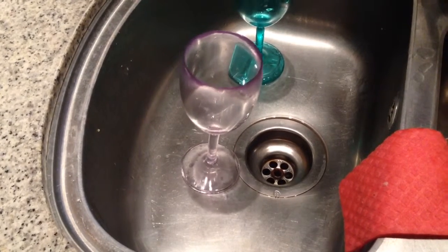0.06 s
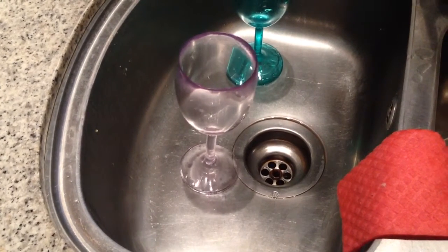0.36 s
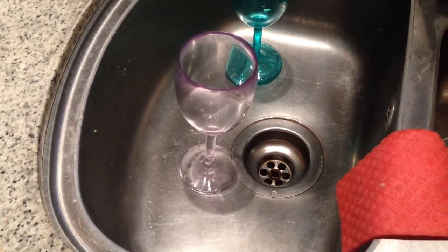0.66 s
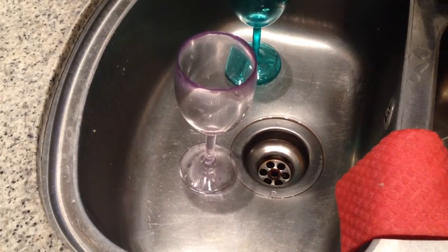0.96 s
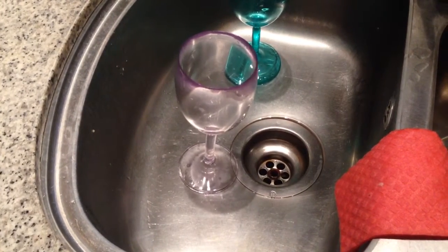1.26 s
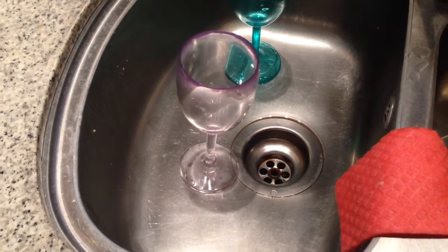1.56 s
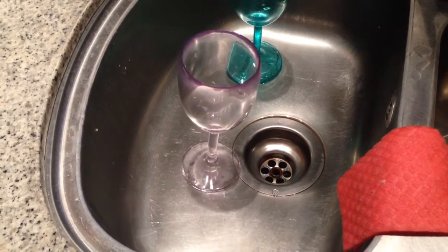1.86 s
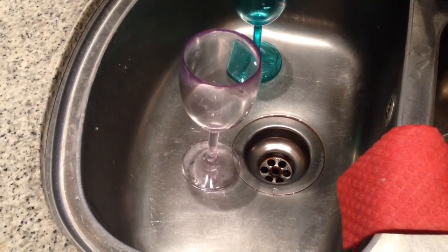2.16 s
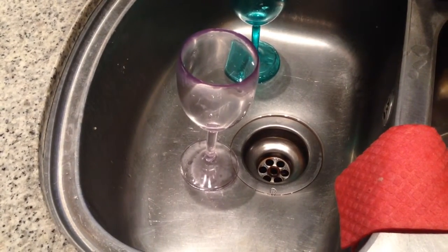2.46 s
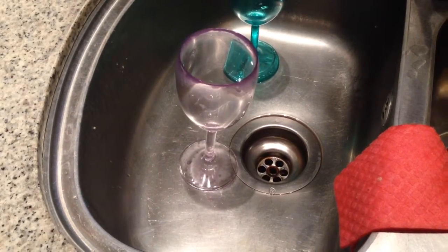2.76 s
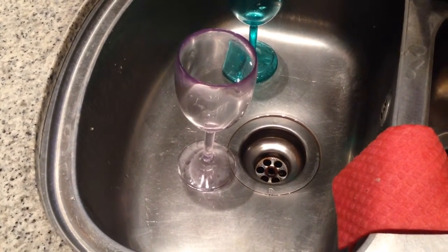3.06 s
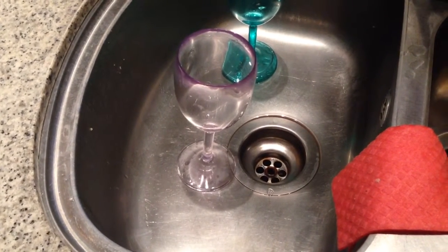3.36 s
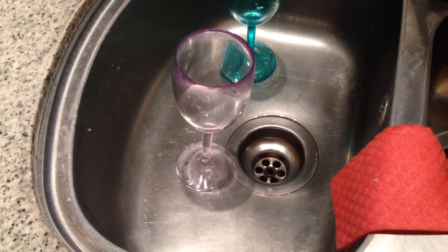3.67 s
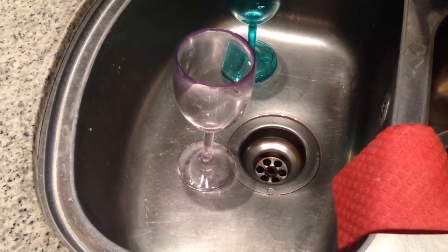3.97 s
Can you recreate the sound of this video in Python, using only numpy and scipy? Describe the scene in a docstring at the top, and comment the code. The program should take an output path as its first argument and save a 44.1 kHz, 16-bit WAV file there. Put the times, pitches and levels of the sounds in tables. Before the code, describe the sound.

A plastic wine glass chatters against a steel sink from the start, each knock a light tick with a hollow metal boom. The rattling comes in quick, uneven bursts, strongest from about 0.6 to 1.2 seconds and again around 1.8 to 2.1. It then grows sparser, with a brief flurry near 2.9, fading to soft bumps that end around 3.5 seconds. A faint hiss continues in the small kitchen.

```python
"""Plastic wine glass wobbling in a steel sink

The foot of the glass chatters on the metal in quick, uneven bursts that fade to soft bumps.
Each impact excites damped modes: the basin booms and clangs, the foot clacks, the plastic ticks.
A small kitchen reverberates faintly over a steady hiss."""
import sys
import numpy as np
from scipy import signal
from scipy.fft import rfft, irfft
from scipy.io import wavfile

SR = 44100
rng = np.random.default_rng(int(sys.argv[2]) if len(sys.argv) > 2 else 0)


def int16_out(signal):
    """Quantize to a 16-bit WAV file."""
    q = np.round(np.clip(np.atleast_2d(signal).T, -1, 1) * 32767)
    wavfile.write(sys.argv[1], SR, q.astype(np.int16))


N = 176400

# impacts of the foot on the basin; each part adds its own gain to these levels:
# start_s, boom_db, thud_db, thud_hz, clang_db, clack_db, tick_db
KNOCKS = [(0, -40.5, -43.5, 206, -45.5, -60, -55), (0.0539, -53, -44, 228, -70, -59.5, -66),
          (0.091, -68, -37, 215, -44.5, -56, -53), (0.1394, -42, -29.5, 218, -46, -58, -50),
          (0.1875, -36.5, -28.5, 213, -41.5, -53.5, -51.5), (0.2325, -44, -51, 216, -49.5, -58.5, -63),
          (0.2382, -60, -47, 190, -45, -65, -61), (0.2702, -46.5, -63, 222, -52.5, -61, -63),
          (0.3281, -62, -48, 217, -49, -59, -57), (0.3579, -46, -42, 232, -52, -67, -61.5),
          (0.3808, -39.5, -44, 224, -51, -68, -61), (0.4022, -40.5, -52, 216, -56, -82, -67),
          (0.4232, -51.5, -49, 211.5, -58, -76, -64), (0.4417, -37, -48, 226, -54, -71, -62),
          (0.5385, -52, -49, 188, -54, -69, -78), (0.583, -56, -54, 215, -56, -65.5, -68),
          (0.6082, -44.5, -47, 211, -58, -65, -78), (0.6362, -39.5, -50, 213, -53, -60.5, -58),
          (0.6634, -34.5, -31, 214.5, -47, -59, -49), (0.6979, -35, -33.5, 209, -46.5, -62, -54.5),
          (0.731, -36.5, -32.5, 213, -50, -63, -49.5), (0.7629, -36, -39, 209, -44, -56, -51.5),
          (0.7951, -38, -29, 204.4, -48, -59, -50), (0.8935, -37, -38.5, 215, -51, -62, -56),
          (0.925, -41, -39.5, 220, -44, -64, -51.5), (0.9567, -35.5, -32.5, 213, -50, -61, -48),
          (0.9878, -57, -29.5, 217, -46.5, -64, -55.5), (1.0173, -39, -30.5, 208.4, -58, -58.5, -54),
          (1.047, -42, -54, 226, -48, -60, -56.5), (1.0588, -47, -52, 228, -49, -74, -78),
          (1.1221, -41, -38, 206.5, -48, -56, -53.5), (1.1525, -50, -49, 221, -52.5, -81, -61),
          (1.1759, -35.5, -60, 199, -66, -74, -80), (1.2985, -52, -48, 220, -49.5, -60.5, -60.5),
          (1.3624, -45.5, -42.5, 206, -51, -59.5, -62), (1.3803, -43, -45, 208, -60, -63, -57.5),
          (1.4022, -38, -47, 203, -51, -65, -58), (1.4489, -38.5, -38, 214, -53, -65, -57),
          (1.4952, -40, -43.5, 242, -60, -66, -56.5), (1.5135, -47, -47, 226, -49, -64, -59),
          (1.5302, -42, -52, 210, -53, -66, -65), (1.5837, -43, -45, 215, -51, -60.5, -59),
          (1.5955, -41, -43.5, 204, -54, -88, -68), (1.7437, -51, -45, 212, -49.5, -68, -68),
          (1.7809, -47, -51, 216, -61, -62, -68), (1.801, -40, -48, 232, -48.5, -64, -64),
          (1.812, -54, -59, 222, -51.5, -63.5, -57.5), (1.8392, -40.5, -37.5, 212, -60, -65, -56.5),
          (1.8676, -35, -41, 205, -45, -65, -52), (1.8987, -43.5, -30.5, 206, -47.5, -61, -52.5),
          (1.9269, -35, -51, 233, -60, -60, -52.5), (1.9305, -55, -37.5, 198, -43, -68, -64),
          (1.9839, -47, -54, 203, -51, -61, -60.5), (2.0048, -39.5, -42.5, 201, -49.5, -64, -58.5),
          (2.0268, -38, -51, 204, -59, -67, -57.5), (2.0488, -49, -49, 210, -53, -79, -69),
          (2.0698, -40.5, -42, 200, -55, -68, -60.5), (2.0906, -40, -55, 210, -53, -76, -65),
          (2.1122, -42.5, -48, 228, -55, -74, -70), (2.1852, -41.5, -43.5, 208, -48.5, -67, -57.5),
          (2.3219, -55, -52.5, 218, -56.5, -73, -84), (2.3846, -45, -49, 215, -55, -67, -62.5),
          (2.5103, -48.5, -62, 216, -59, -81, -80), (2.5694, -45, -62, 234, -55.5, -68, -61.5),
          (2.6023, -41, -53, 209, -63, -76, -64), (2.6204, -42, -49, 205, -55.5, -74, -65),
          (2.7126, -38, -41, 216, -54, -68, -61.5), (2.8248, -47, -55, 209, -59, -83, -78),
          (2.8733, -47, -44, 224, -56, -73, -63.5), (2.891, -42, -41.5, 209.6, -75, -70, -63),
          (2.9107, -35.5, -39.5, 199, -52.5, -68, -61.5), (2.983, -44.5, -46, 213, -62, -69, -70),
          (3.0614, -46, -62, 215, -66, -74, -77), (3.102, -42, -48, 204, -67, -68, -68.5),
          (3.1282, -46, -44, 217, -55, -77, -88), (3.1669, -49, -48, 218, -65, -83, -68.5),
          (3.2133, -80, -64, 220, -62, -74, -81), (3.3113, -48.5, -53.5, 204, -65, -77, -85),
          (3.3857, -52.5, -65, 214, -61, -86, -69), (3.4652, -49.5, -64, 210, -65.5, -77, -78)]


def amp(db):
    """Amplitude grows tenfold for every 20 dB."""
    return 10 ** (np.asarray(db) / 20)


def unit(x):
    """Normalisation to an rms of 1."""
    return x / np.sqrt(np.mean(x ** 2) + 1e-20)


def read(points, hz):
    """Interpolation of a table along a logarithmic frequency axis."""
    freqs, values = np.transpose(points)
    return np.interp(np.log(hz + 1), np.log(freqs + 1), values)


def add(mix, start_s, sound):
    """Superposition: a sound joins the mix at its start time."""
    part = mix[max(round(start_s * SR), 0):][:len(sound)]
    part += sound[:len(part)]


def noise(spectrum, size):
    """Spectral shaping: white noise takes on the given colour, at an rms of 1."""
    gain = amp(read(spectrum, np.fft.rfftfreq(size, 1 / SR)))
    return unit(irfft(rfft(rng.standard_normal(size)) * gain, size))


def contact(peak_s, size):
    """Contact force: a pulse that swells to its peak and relaxes exponentially."""
    u = np.arange(size) / SR / peak_s
    return u * np.exp(1 - u)


def ring(modes, size, detune=0):
    """Free vibration: each mode is an exponentially damped sine, one to a row."""
    hz, db, t60 = np.transpose(modes)[:3, :, None]
    t = np.arange(size) / SR
    hz = hz * (1 + detune * rng.standard_normal(hz.shape))
    end_fade = np.minimum(10 * (1 - t / t[-1]), 1)
    return amp(db - 60 * t / t60) * np.sin(2 * np.pi * hz * t) * end_fade


def strike(modes, peak_s, size, tilt_db=0):
    """Forced vibration: a short, rough skid drives the modes, a little differently each time."""
    roughness, spread_db = 6, 1.3
    rings = ring(modes, size, detune=0.007)
    push = contact(peak_s, size=SR // 50)
    t = np.arange(len(push)) / SR
    cycles = np.transpose(modes)[0][:, None] * t + rng.random((len(modes), 1))
    drive = push * (np.sin(2 * np.pi * cycles) + roughness * rng.standard_normal(cycles.shape))
    shaken = signal.fftconvolve(rings, drive, axes=1)
    keep_energy = np.linalg.norm(rings, axis=1) / np.linalg.norm(shaken, axis=1)
    gains = keep_energy * amp(tilt_db + spread_db * rng.standard_normal(len(rings)))
    sound = gains @ shaken
    return sound / np.sqrt(np.mean(sound[:round(0.012 * SR)] ** 2))  # rms 1 over the first 12 ms


def background():
    """Stationary noise: broadband hiss, a slight rumble and three faint, whirring bands."""
    # spectra of the hiss and the rumble: frequency_hz, relative_density_db
    hiss = [(15, -55), (25, -41), (163, 4.5), (293, -4), (318, -2.5), (404, 1.5), (475, -7.5), (749, -9.5),
            (1120, -13), (2500, -14), (3930, -13.5), (5420, -15), (15000, -17.5)]
    rumble = [(15, -35), (35, -6), (52, -2), (75, -6), (150, -19), (600, -70)]
    # narrow bands of noise: centre_hz, half_width_hz, level_db
    bands = [(405, 26, -78.5), (745, 19, -84.5), (2468, 71, -80.5)]
    freqs, whirr = np.fft.rfftfreq(N, 1 / SR), np.zeros(N)
    for hz, width, db in bands:
        spectrum = rfft(rng.standard_normal(N)) / (1 + ((freqs - hz) / width) ** 2)
        whirr += amp(db) * unit(irfft(spectrum, N))
    return amp(-65) * noise(hiss, N) + amp(-82.5) * noise(rumble, N) + whirr


def kitchen(x):
    """Reverberation: a short diffuse tail in which each band decays at its own rate."""
    # reverberation times of the room: frequency_hz, t60_s
    decay_times = [(100, 0.74), (500, 0.35), (2500, 0.59), (8000, 0.15)]
    hz, t, spectra = signal.stft(rng.standard_normal(SR // 2), SR, nperseg=256)
    envelope = amp(-60 * t / read(decay_times, hz)[:, None]) * np.minimum(t / 0.015, 1)
    tail = signal.istft(spectra * envelope, SR, nperseg=256)[1]
    return signal.fftconvolve(x, tail / np.linalg.norm(tail))[:N]


def basin_bumps():
    """Mass on a spring: the whole basin swings for a cycle or two on its mounting."""
    # the weight of the glass lands squarely: start_s, level_db
    landings = [(.69, -55), (.745, -50), (.795, -60), (1.485, -57), (2.615, -62), (2.712, -59), (2.92, -53)]
    out, t = np.zeros(N), np.arange(SR // 8) / SR
    mounting_hz = 62
    bump = contact(peak_s=0.0058, size=len(t)) * np.sin(2 * np.pi * mounting_hz * t)
    for start_s, db in landings:
        add(out, start_s, amp(db) * bump)
    return out


def foot_slaps():
    """Transient resonance: the foot lands flat on wet steel with a hollow note that falls in pitch."""
    # slaps that end a burst of chatter: start_s, level_db, settled_pitch_hz
    slaps = [(0.236, -48, 405), (1.057, -49.5, 405), (1.529, -51.5, 415), (1.931, -44, 455)]
    out, t = np.zeros(N), np.arange(SR // 12) / SR
    overshoot, settle_s = 0.29, 0.003
    envelope = contact(peak_s=0.0064, size=len(t))
    for start_s, db, hz in slaps:
        pitch = hz * (1 + overshoot * np.exp(-t / settle_s))
        add(out, start_s, amp(db) * envelope * np.sin(2 * np.pi * np.cumsum(pitch) / SR))
    return out


def chatter():
    """Impact excitation: steel, foot and bowl ring, their modes weighted by the kind of touch."""
    # higher modes of the steel sheet: pitch_hz, level_db, t60_s
    sheet = [(276.3, 2, 0.13), (346, 1.5, .1), (412.3, -4.5, 0.35), (423, -10.5, 0.081), (483, -4.5, 0.091),
             (582.5, -4.5, 0.078), (638.3, 2, 0.056), (678, -5, 0.08), (815.7, -11, .12)]
    # modes of the foot and the steel under it: pitch_hz, level_db, t60_s, light_touch_change_db
    foot = [(1013, -5, 0.048, -8.5), (1042, -2, 0.023, -4.5), (1119, -5, 0.11, -8), (1187, -4, 0.044, -3.5),
            (1335, -7, 0.04, 6.5), (1394, -6, 0.056, 5), (1490, -20, 0.038, 1)]
    # modes of the plastic bowl and stem: pitch_hz, level_db, t60_s, after_pause_change_db
    bowl = [(1836, -14, 0.045, 7.5), (2273, 2.5, 0.025, -1.5), (2318, 2.5, 0.031, -3),
            (2697, -8, 0.027, 17.5), (2784, -9, 0.049, 7.5), (3312, -5.5, 0.032, -5.5),
            (3943, 2, 0.017, 7.5), (4018, -4.5, 0.023, 5), (4440, -33, 0.036, -2), (5510, -12, 0.03, -3),
            (6020, -11.5, 0.025, 2), (7000, -14, 0.015, -11), (7670, -8, .018, -9), (9600, -20, 0.013, -8)]
    # spectrum of the unpitched scrape of the contact: frequency_hz, relative_density_db
    friction = [(300, -20), (1500, -1), (4000, -3.5), (8000, -9.5), (12000, -18.5), (16000, -12)]
    hard_db, light_db = -53.5, -62.5  # tick_db of a hard knock and of a light touch
    lead_s, pause_s = 0.001204, 0.055
    out, previous_s = np.zeros(N), 0
    for start_s, *_, clang_db, clack_db, tick_db in KNOCKS:
        touch_s = start_s - lead_s  # the rim touches just before the weight comes down
        lightness = np.clip((hard_db - tick_db) / (hard_db - light_db), 0, 1)
        after_pause = start_s - previous_s > pause_s
        previous_s = start_s
        clang = strike(sheet, peak_s=0.0021, size=SR // 6)
        clack = strike(foot, peak_s=0.0023, size=SR // 12, tilt_db=lightness * np.array(foot)[:, -1])
        tick = strike(bowl, peak_s=0.0018, size=SR // 25, tilt_db=after_pause * np.array(bowl)[:, -1])
        scrape = 2 * contact(peak_s=0.003, size=1024) * noise(friction, size=1024)
        add(out, touch_s, amp(clang_db - 6.5) * clang)
        add(out, touch_s, amp(clack_db - 2.5) * clack)
        add(out, touch_s, amp(tick_db - 4.5) * tick)
        add(out, touch_s, amp(tick_db - 13) * scrape)
    return out


def basin_boom():
    """Interference: knocks in quick succession reinforce or cancel in the basin's low modes."""
    # the basin floor flexing as a whole: pitch_hz, level_db, t60_s
    floor = [(85.4, -12, 0.33), (155.86, 2, 0.33)]
    # the patch loaded by the glass, its pitch shifting as the foot rocks: pitch_ratio, level_db, t60_s
    patch = [(0.998, 0, .12), (1.218, -29.5, 0.3)]
    lag_s = 0.00088  # the heavy basin follows a moment after the contact
    out, boom = np.zeros(N), ring(floor, size=SR // 3).sum(0)
    for start_s, boom_db, thud_db, thud_hz, *_ in KNOCKS:
        thud = ring(np.array(patch) * [thud_hz, 1, 1], size=SR // 3).sum(0)
        add(out, start_s + lag_s, amp(boom_db) * boom + amp(thud_db) * thud)
    low_cut = signal.butter(3, 125, "high", fs=SR, output="sos")  # the boom carries little of the deepest bass
    return amp(-1.5) * signal.sosfilt(low_cut, out)


def scene():
    """Superposition of direct sound, reverberation and background in one channel."""
    boom = basin_boom() + basin_bumps()
    rattle = chatter() + foot_slaps()
    reverberation = kitchen(amp(-13) * rattle + amp(-15) * boom)
    return (boom + rattle + reverberation + background())[None]


def record(dry):
    """Band limiting: a steep low-pass filter removes the highest treble."""
    cutoff_hz = 15450
    low_pass = signal.firwin(1023, cutoff_hz, window=("kaiser", 9), fs=SR)
    return signal.oaconvolve(dry, low_pass[None], "same")


dry = scene()
out = record(dry)
int16_out(out)
```